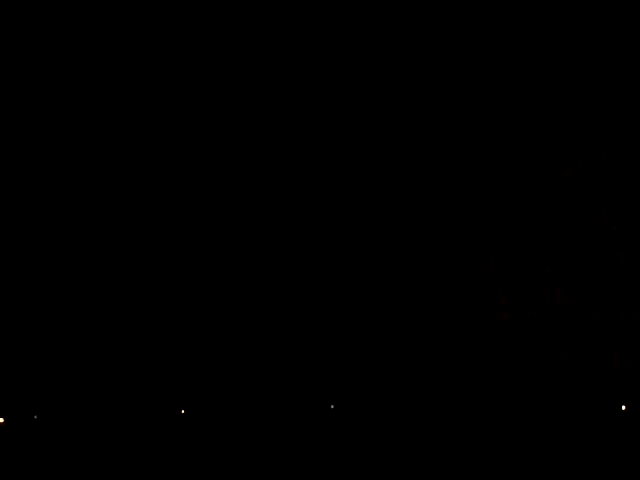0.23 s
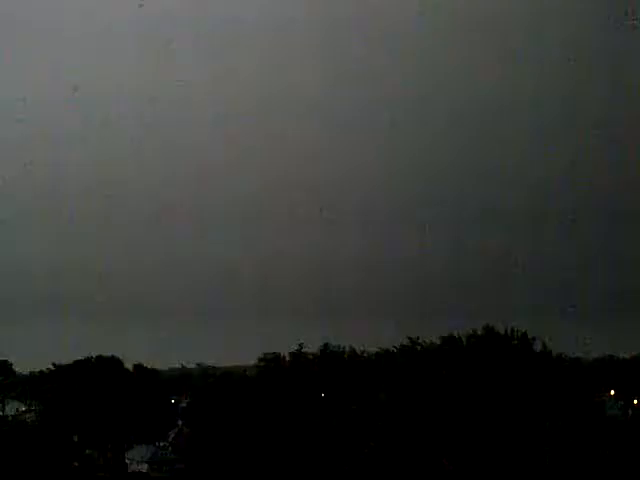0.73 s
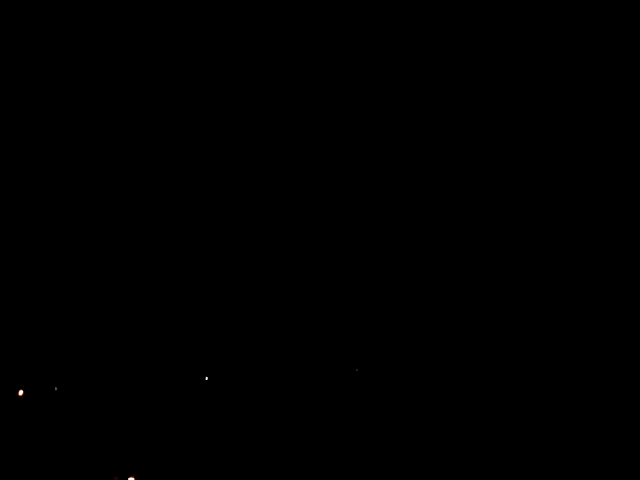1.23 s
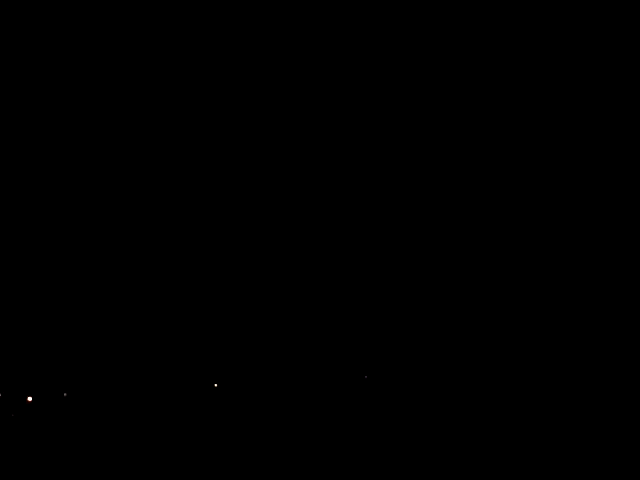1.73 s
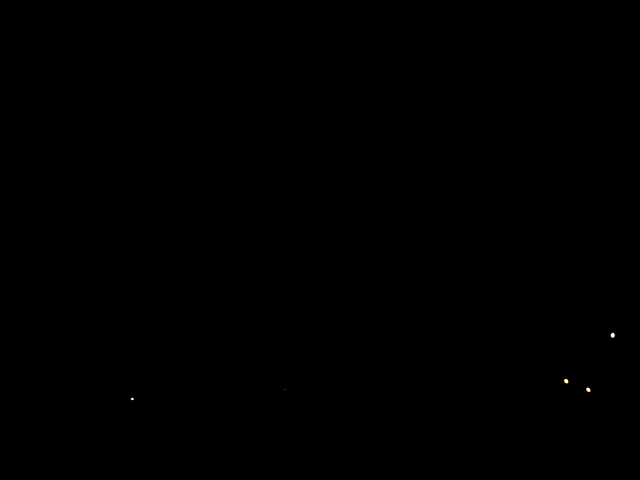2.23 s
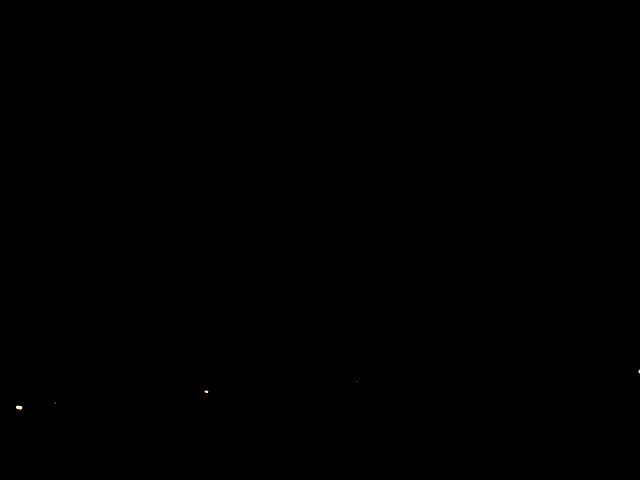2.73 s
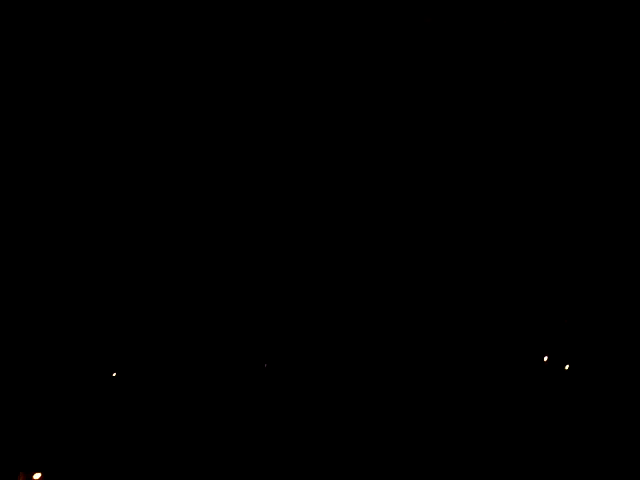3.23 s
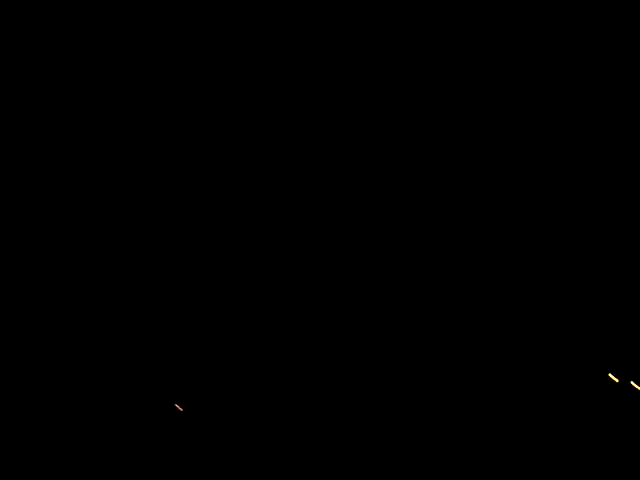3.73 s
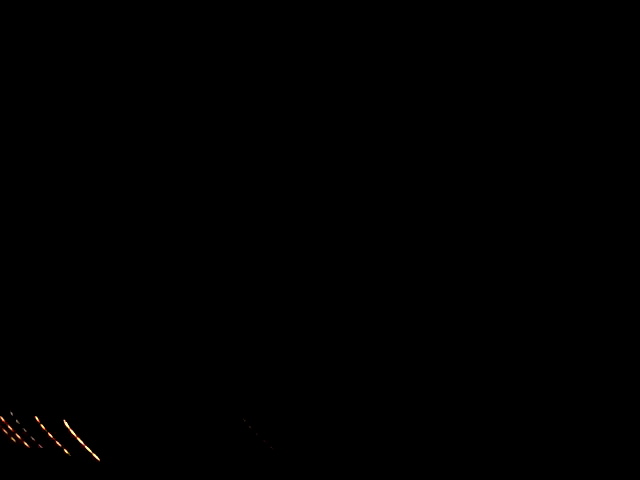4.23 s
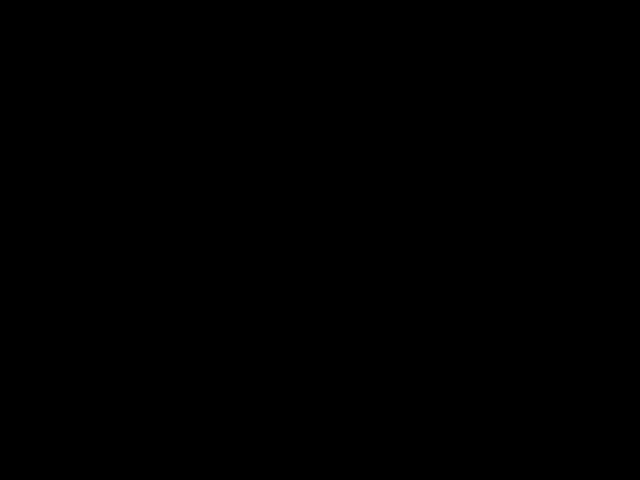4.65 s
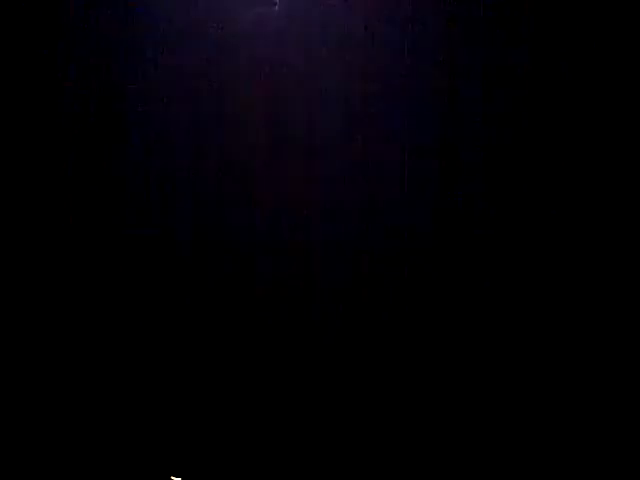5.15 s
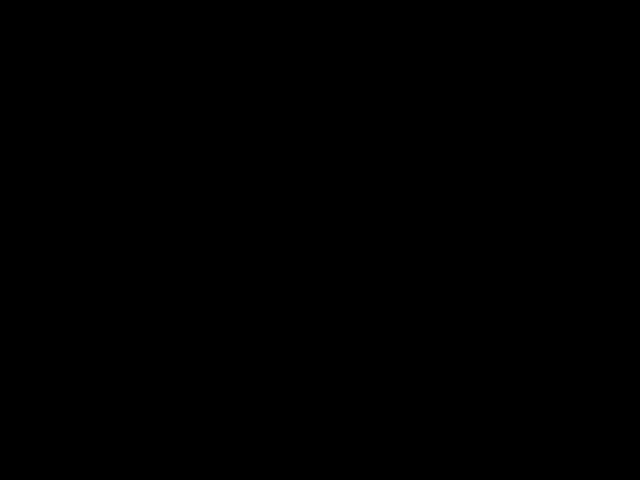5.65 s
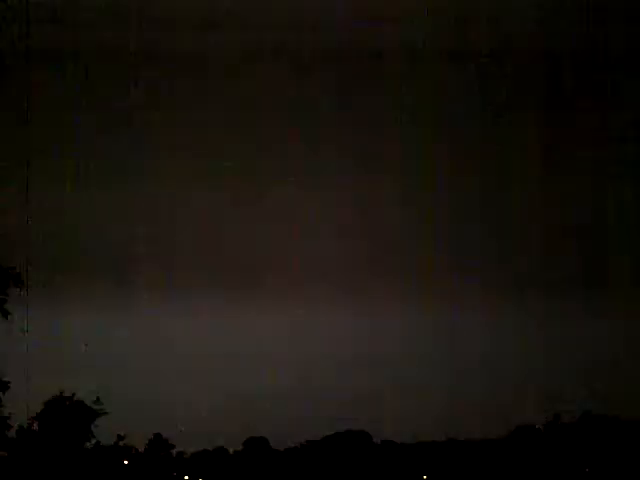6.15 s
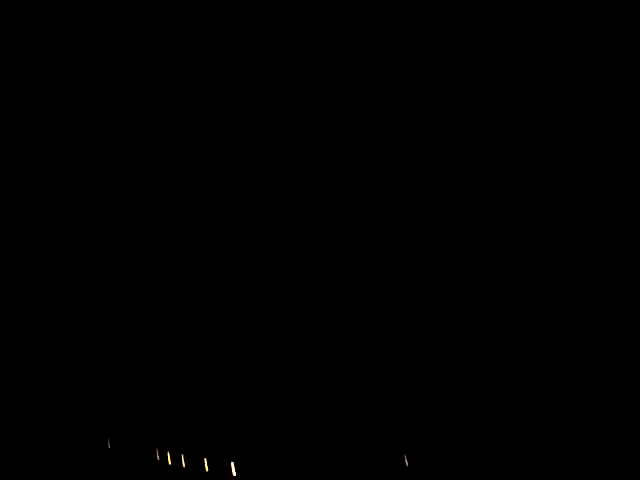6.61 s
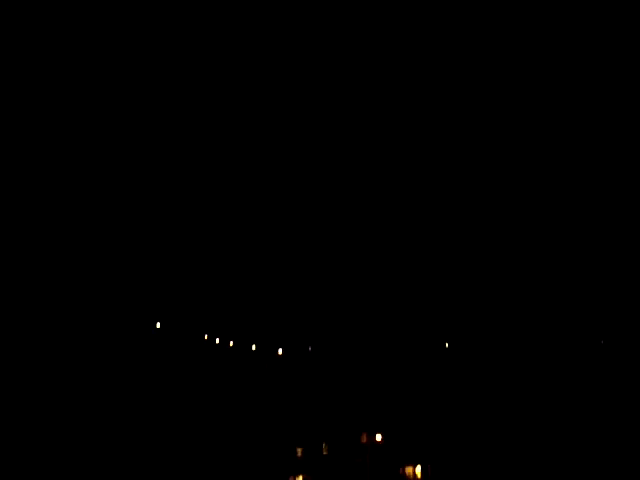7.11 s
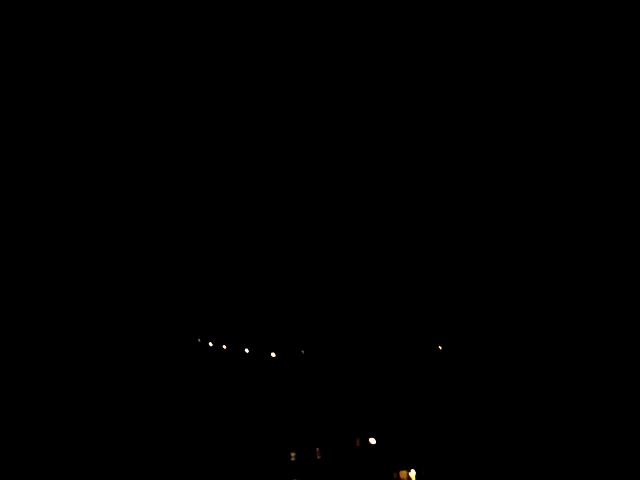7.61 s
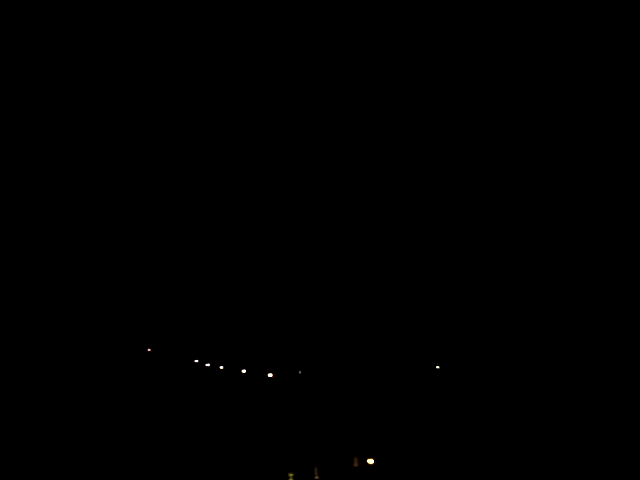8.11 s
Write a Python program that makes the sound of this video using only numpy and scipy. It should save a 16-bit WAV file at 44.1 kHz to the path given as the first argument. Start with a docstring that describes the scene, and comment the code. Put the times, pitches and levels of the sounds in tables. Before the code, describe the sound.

Steady night rain runs throughout, a soft wide wash with closer pattering and sparse tiny ticks, picked up by a small dull-sounding microphone under shelter. Thunder is already rumbling at the start, surging at about 0.6-0.8 s, then growing rougher from 1.2 s with a strong crack near 1.4-1.5 s, rattling and crackling. It keeps rolling in overlapping peals and thuds, strong around 2.4-3.2 s, then eases after 3.4 s. Faint taps occur at 0.5 and 1.25 s; a click at 4.0 s leads to hard hollow handling knocks at 4.15-4.4 s with a faint rustle and soft swish. The close patter drops away by 4.5 s. Low distant rumble continues, swelling at 5.5-6.0 s into a deep, muffled boom, with another brief swish near 6.0 s. Duller rolls return around 6.7-7.5 s, then fade to rain, with a sharp tap at 8.06 s.

```python
"""Thunder rolls in two long swells over steady night rain, heard from a sheltered spot.
Filtered random fronts make it: the first swell is nearer, with claps and rattle, the second far and dull.
Random drop impulses make the wash of rain all around and a closer patter that drops away halfway.
Taps and handling knocks on the microphone housing are ringing sines and short hiss;
a faint rustle close by and brief soft swishes around one pitch are shaped from dense random grains."""
import sys
import numpy as np
from scipy import signal
from scipy.fft import rfft, irfft, next_fast_len
from scipy.io import wavfile
from scipy.ndimage import uniform_filter1d

SR = 44100
rng = np.random.default_rng(int(sys.argv[2]) if len(sys.argv) > 2 else 0)


def transcribe(u):
    """Save the signal u as a 16-bit wav file named by the first command-line argument.

    u: samples, shape (n,) or (channels, n), limited to [-1, 1]; the rate is SR.
    q: integer samples, one column per channel.
    """
    v = np.clip(np.atleast_2d(u).T, -1, 1)
    q = np.round(v * 32767).astype(np.int16)
    wavfile.write(sys.argv[1], SR, q)


N = 369116
TIME = np.arange(N) / SR  # s


def from_db(db):
    """Decibels to amplitude gain."""
    return 10 ** (np.asarray(db) / 20)


def rms_one(x):
    """Scale to unit power."""
    return x / np.sqrt(np.mean(x ** 2) + 1e-20)


def in_time(rows):
    """Each column of a curve, drawn in straight lines between its points, at every sample."""
    moments, *columns = np.transpose(rows)
    return [np.interp(TIME, moments, column) for column in columns]


def coloured(x, spectrum):
    """Causal (minimum-phase) filter with the given spectrum, falling away beyond its ends; rms 1."""
    size = next_fast_len(N + SR // 2, real=True)
    hz, db = np.transpose(spectrum)
    octave = np.log2(np.maximum(np.arange(size // 2 + 1) * SR / size, 1))
    points = np.log2(hz)
    octaves_beyond = np.abs(octave - np.clip(octave, points[0], points[-1]))
    # 20 dB per octave beyond the ends, for two octaves
    level_db = np.interp(octave, points, db) - 20 * np.minimum(octaves_beyond, 2)
    # folding the cepstrum onto positive times gives minimum phase
    cepstrum = irfft(np.log(from_db(level_db)), size)
    cepstrum[1:size // 2] *= 2
    cepstrum[size // 2 + 1:] = 0
    response = np.exp(rfft(cepstrum))
    return rms_one(irfft(rfft(x, size) * response, size)[:N])


def arrivals(per_s, spread_db):
    """Impulses at random moments, many small and a few large; rms 1."""
    sizes = from_db(spread_db * np.minimum(rng.exponential(1, N), 4))
    signed_sizes = sizes * rng.choice([-1, 1], N)
    return rms_one(signed_sizes * (rng.random(N) < per_s / SR))


def evened(x, span_s):
    """Keep the fast grain of a sound and take out its slower swings."""
    size = max(int(span_s * SR / 2), 2)
    power = uniform_filter1d(uniform_filter1d(x ** 2, size), size)
    return x / np.sqrt(np.abs(power) + 1e-6)


def ring(start, hz, t60):
    """A sine that starts at a moment and dies away from height 1, cut off after 0.2 s."""
    out = np.zeros(N)
    first = int(start * SR)
    age = TIME[:min(SR // 5, N - first)]
    out[first:first + len(age)] = np.sin(2 * np.pi * hz * age) * from_db(-60 * age / t60)
    return out


def swell(start, rise_s, t60):
    """An envelope that climbs smoothly to 1 and then dies away."""
    age = TIME - start
    rise = np.sin(np.pi / 2 * np.clip(age / rise_s, 0, 1)) ** 2
    return rise * from_db(-60 * np.maximum(age - rise_s, 0) / t60)


def rain():
    """Countless far drops merge to a wash; fewer, closer ones patter, and the nearest tick one by one."""
    # tone of the wide wash: (f/Hz, relative level per Hz/dB)
    wash_tone = [(300, 3), (600, 2.5), (800, -1), (1080, 2.5), (1350, -2), (1700, -6.5), (2500, -8),
                 (3200, -10.5), (3900, -15), (4700, -16), (6000, -22), (7000, -31.5), (7600, -48.5)]
    # level of the closer patter, which drops away halfway: (t/s, level/dB)
    patter_level = [(0, -53.5), (4.38, -53), (4.52, -75.5), (8.37, -62.5)]
    # tone of the patter: (f/Hz, relative level per Hz/dB)
    patter_tone = [(700, -8), (1300, 2.5), (1900, 3.5), (2500, 2), (3000, -3), (3700, -20.5), (5000, -28),
                   (7000, -38)]
    tick_tone = [(1800, -5.0), (3000, -1.5), (4800, -3), (7000, -11)]
    wash_db, ticks_db = -49, -71
    wash = from_db(wash_db) * coloured(arrivals(per_s=14000, spread_db=2.5), wash_tone)
    patter_gain = from_db(in_time(patter_level)[0])
    patter = patter_gain * coloured(arrivals(per_s=8000, spread_db=3.5), patter_tone)
    ticks = from_db(ticks_db) * coloured(arrivals(per_s=47, spread_db=2.5), tick_tone)
    return wash + patter + ticks


def swishes():
    """Brief soft swishes of uncertain source: dense random grains filtered to a band around one pitch."""
    # swishes: (start t/s, swell/s, crest level/dB, pitch f/Hz, t60/s)
    swish_events = [(4.42, 0.04, -47, 850, 0.4), (6.01, 0.059, -48.5, 1030, 0.2),
                    (6.08, 0.073, -57.5, 3200, 0.85)]
    # their tone: (multiple of the pitch, relative level per Hz/dB)
    swish_tone = [(0.6, -29.5), (0.82, -5), (1, -2.5), (1.12, -6), (1.3, -14), (1.7, -23)]
    out = 0
    for start, rise_s, db, hz, t60 in swish_events:
        tone = [(multiple * hz, tone_db) for multiple, tone_db in swish_tone]
        grains = coloured(arrivals(per_s=7500, spread_db=4.5), tone)
        out = out + from_db(db) * swell(start, rise_s, t60) * grains
    return out


def rustle():
    """A faint, grainy rustle close to the microphone around the handling knocks."""
    tone = [(1200, -1), (2300, 2.5), (3200, -7), (5000, -5), (7000, -19)]
    crest_db = -58
    grains = coloured(arrivals(per_s=2000, spread_db=5.0), tone)
    return from_db(crest_db) * swell(start=4.1, rise_s=0.095, t60=0.9) * grains


def close_taps():
    """Taps and handling knocks on the microphone housing, each a tick, a hissing snap and a modal thud."""
    # taps and knocks, levels ahead of the filters below:
    # (t/s, tick level/dB, tick f/Hz, cycles for the tick to fall 60 dB, snap level/dB, thud level/dB)
    taps = [(0.505, -32, 2950, 16, -58, -58), (1.2463, -33, 3480, 5, -35, -54),
            (3.9722, -27, 2050, 12, -48, -35), (3.973, -33, 3800, 12, -42, -55),
            (4.1536, -52, 2000, 5, -55, -26), (4.165, -22, 1710, 5.5, -20.5, -20.5),
            (4.1748, -36, 1200, 9, -26, -33), (4.1799, -44, 4700, 60, -48, -19),
            (4.1939, -44, 2400, 12, -46, -22), (4.3489, -25.5, 2410, 7.1, -30, -11),
            (4.408, -48, 2980, 5, -33, -58), (8.062, -29, 1100, 3.5, -15, -37)]
    # modes of the housing: (f/Hz, level relative to the thud/dB, t60/s)
    housing_modes = [(240.6, -2, 0.065), (326, -4.5, 0.028), (504, -16.5, 0.042), (715, -9.5, 0.0082),
                     (1100, -15.5, 0.0091)]
    snap_hz, snap_t60 = 5500, 0.00052  # Hz, s
    hiss_db, hiss_rise_s, hiss_t60 = -23, 0.00072, 0.018  # level relative to the snap
    contact_hz, thud_low_hz, tick_top_hz = 1300, 110, 6800  # filter corners
    ticks, thuds = np.zeros((2, N))
    hiss = coloured(rng.standard_normal(N), [(1000, -2), (2500, -3.5), (4000, -2), (7000, -15.0)])
    for start, tick_db, tick_hz, tick_cycles, snap_db, thud_db in taps:
        ticks += from_db(tick_db) * ring(start, tick_hz, tick_cycles / tick_hz)
        snap = ring(start, snap_hz, snap_t60)
        short_hiss = from_db(hiss_db) * swell(start, hiss_rise_s, hiss_t60) * hiss
        ticks += from_db(snap_db) * (snap + short_hiss)
        thuds += sum(from_db(thud_db + db) * ring(start, hz, t60) for hz, db, t60 in housing_modes)
    # the tiny offsets keep the filters out of denormal numbers
    soft = signal.sosfilt(signal.butter(6, contact_hz, fs=SR, output="sos"), thuds + 1e-18)
    ticks = signal.sosfilt(signal.butter(6, tick_top_hz, fs=SR, output="sos"), ticks + 1e-18)
    return ticks + signal.sosfilt(signal.butter(1, thud_low_hz, "high", fs=SR, output="sos"), soft)


def surges():
    """Many fronts arrive together as one short, deep surge."""
    # deep surges: (start t/s, swell/s, crest level/dB)
    surge_events = [(0.6, 0.17, -31), (1.24, 0.07, -46), (1.62, 0.06, -45), (2.04, 0.056, -39),
                    (2.33, 0.05, -39.5), (3.43, 0.06, -39), (4.75, 0.051, -46), (5.71, 0.094, -28),
                    (5.88, 0.059, -40), (6.68, 0.052, -34.5), (6.99, 0.06, -39), (7.41, 0.059, -37)]
    # their tone: (f/Hz, relative level per Hz/dB)
    surge_tone = [(25, -13.5), (40, -0.5), (55, 1), (80, 0.5), (105, 0.5), (140, -4.5), (220, -25.5)]
    t60 = 0.48  # s
    gain = sum(from_db(db) * swell(start, rise_s, t60) for start, rise_s, db in surge_events)
    return gain * evened(coloured(arrivals(per_s=340, spread_db=1.5), surge_tone), span_s=0.049)


def thumps():
    """The strongest fronts stand out as short, soft-edged thuds: decaying sines through a low-pass."""
    # single fronts: (t/s, level ahead of the low-pass/dB, f/Hz, cycles to die away by 60 dB)
    strong_fronts = [(0.711, -20, 105, 10), (0.738, -15, 125, 8), (0.768, -17.5, 185, 13),
                     (0.779, -20, 270, 10), (0.98, -25, 200, 9), (1.283, -20, 222, 4.5),
                     (1.498, -12.5, 218, 6), (1.554, -16, 190, 8), (1.564, -14, 206, 19),
                     (2.004, -22, 190, 14), (2.233, -21, 250, 2), (2.611, -21, 224, 15),
                     (2.902, -19, 350, 15), (2.95, -18, 261, 9), (3.073, -14.5, 228, 15),
                     (3.147, -19, 236, 16), (3.49, -13, 170, 1.5), (3.885, -23, 220, 16),
                     (4.606, -23, 240, 11), (5.074, -21, 231, 8.5), (5.772, -21, 107, 9),
                     (5.786, -19, 130, 9), (5.807, -16, 200, 3), (5.965, -15, 178, 12.5),
                     (6.011, -26, 250, 13), (6.266, -22.5, 237, 14), (6.737, -18, 115, 10),
                     (6.753, -14, 214, 8.5), (7.021, -22, 230, 9), (7.043, -23, 115, 9),
                     (7.284, -26, 250, 14), (7.503, -22.5, 375, 14)]
    thuds = sum(from_db(db) * ring(start, hz, cycles / hz) for start, db, hz, cycles in strong_fronts)
    return signal.sosfilt(signal.butter(3, 520, fs=SR, output="sos"), thuds + 1e-18)


def claps():
    """A bend of the channel that lies across the line of sight arrives all at once, as a rough crack."""
    # tight clusters of fronts in the near swell: (start t/s, crest level/dB)
    clap_events = [(0.358, -37), (0.678, -35), (0.719, -32), (1.258, -29), (1.425, -24.5), (1.452, -30),
                   (1.486, -28.5), (1.569, -36), (2.085, -35), (2.335, -32), (2.61, -29.5), (2.738, -28),
                   (2.98, -33), (3.157, -32)]
    # their tone: (f/Hz, relative level per Hz/dB)
    clap_tone = [(180, -9), (300, -4), (430, 4.5), (600, -1), (800, -10.5), (1100, -20), (1500, -25.5),
                 (2400, -40)]
    rise_s, t60 = 0.0045, 0.1  # s
    gain = sum(from_db(db) * swell(start, rise_s, t60) for start, db in clap_events)
    return gain * evened(coloured(arrivals(per_s=600, spread_db=3.5), clap_tone), span_s=0.044)


def thunder_strength(far):
    """Gains of roll, deep boom, rattle and crackle: the peals add their power to the rumble."""
    # continuous rumble in two long swells, ahead of the offsets below: (t/s, level/dB)
    rumble_curve = [(0.0, -35.5), (0.79, -29.5), (1.07, -33), (1.52, -27), (1.87, -30.5), (2.1, -31),
                    (2.38, -29), (2.96, -28), (3.17, -29), (3.36, -37.5), (3.95, -37), (5.48, -38.5),
                    (5.82, -27.5), (6.2, -31), (6.36, -34.5), (7.2, -34.5), (7.55, -32), (8.37, -39)]
    # peals, one for each stretch of the lightning channel: (start t/s, swell/s, crest level/dB,
    # boom level/dB, rattle level/dB, crackle level/dB; the last three relative to the crest)
    peals = [(0.08, 0.1, -32, -21, -13, -25), (0.47, 0.26, -31, 3.5, -6.5, -30),
             (0.88, 0.1, -39, 5, -17, -18), (1.13, 0.16, -31, -3, -14, -10),
             (1.31, 0.19, -34, -3, 1.5, -2.5), (1.6, 0.15, -35, -2, -4.5, -11.5),
             (1.95, 0.14, -27.5, -11.5, -4.5, -13), (2.13, 0.1, -32, -3, -3, -12),
             (2.46, 0.27, -28, -16, -5.5, -12), (2.8, .19, -27, -14.5, -6.5, -11),
             (2.99, .16, -28.5, -24, -17, -10.5), (3.21, 0.1, -32.5, -4, -6, -9.5),
             (3.39, 0.07, -30.5, -10, -9.5, -17), (3.6, 0.1, -38, -0.5, -18, -17),
             (3.8, 0.14, -33.5, -10.5, -15, -21), (4.48, 0.13, -34, -8, -15, -23),
             (4.7, 0.12, -38, -3, -17, -15), (4.94, 0.1, -36.5, -17, -14, -26),
             (5.5, 0.18, -31.5, -13.5, -28, -28), (5.84, 0.2, -35, -7.5, -15, -27),
             (6.16, 0.12, -38, -3, -22, -31), (6.64, 0.095, -34.5, -3, -14, -25),
             (6.86, 0.17, -31.5, -11, -16, -25), (7.18, 0.12, -35.5, -12, -16, -26),
             (7.35, 0.16, -35, -6, -11, -22), (7.8, 0.25, -47, 5, -29, -21)]
    peal_t60 = 0.72  # s
    roll_offset_db = -1  # relative to the curve
    boom_mean_db, boom_follows = -39.5, 0.55  # the boom lingers: share of the curve's swing it follows
    near_rattle_db, far_rattle_db = -2.5, -47.5  # near: relative to the roll; far: a faint, even level
    crackle_db = -10  # relative to the rattle
    rumble_db, = in_time(rumble_curve)
    roll_db = rumble_db + roll_offset_db
    boom_db = boom_mean_db + boom_follows * (rumble_db - rumble_db.mean())
    rattle_db = (1 - far) * (roll_db + near_rattle_db) + far * far_rattle_db
    power = from_db([roll_db, boom_db, rattle_db, rattle_db + crackle_db]) ** 2
    for start, rise_s, crest_db, *relative_db in peals:
        crests = from_db(crest_db + np.array([0, *relative_db]))
        power += np.outer(crests, swell(start, rise_s, peal_t60)) ** 2
    return np.sqrt(power)


def thunder():
    """Pressure fronts from the kinks of the lightning channel pile up into boom, roll, rattle and crackle."""
    # the near thunder gives way to the far one: (t/s, share of the far one 0-1)
    handover = [(4.2, 0.14), (4.5, 0.94)]
    # tones of the deep boom, near roll, far roll, rattle and bright crackle:
    # (f/Hz, relative level per Hz/dB)
    boom_tone = [(15, -30.5), (30, -14.5), (48, -7.5), (66, -9), (80, -1), (96, -3.5), (115, -3),
                 (150, -8.5), (260, -32)]
    near_roll_tone = [(70, -32), (120, -12), (160, 2), (180, -2.5), (205, 4), (240, -1), (300, -5.5),
                      (345, -3.5), (440, -9), (520, -23.5), (900, -38)]
    far_roll_tone = [(70, -21.5), (115, -5), (165, -4), (215, -1.5), (270, -3.5), (320, -6.5), (375, -16),
                     (450, -18), (620, -28.5), (900, -47)]
    rattle_tone = [(250, -7), (350, 5), (430, 7), (500, 2), (570, 4), (700, -3), (850, -8), (1050, -10.5),
                   (1300, -17.5), (1600, -29.5), (2600, -47.5)]
    crackle_tone = [(450, -14), (720, 5.5), (1000, 0.5), (1200, -4.5), (1500, -15), (2400, -36)]
    roll_trim_db = -0.5  # on the roll of rumble and peals alike
    far = in_time(handover)[0]
    roll_gain, boom_gain, rattle_gain, crackle_gain = thunder_strength(far)
    near_roll = coloured(arrivals(per_s=450, spread_db=2.0), near_roll_tone)
    far_roll = coloured(arrivals(per_s=450, spread_db=0.5), far_roll_tone)  # the air has taken its upper tones
    roll = evened(np.sqrt(1 - far) * near_roll + np.sqrt(far) * far_roll, span_s=0.094)
    boom = evened(coloured(arrivals(per_s=500, spread_db=0.0), boom_tone), span_s=0.18)
    rattle = evened(coloured(arrivals(per_s=2000, spread_db=1.8), rattle_tone), span_s=0.14)
    crackle = evened(coloured(arrivals(per_s=3000, spread_db=1.6), crackle_tone), span_s=0.093)
    low = roll_gain * from_db(roll_trim_db) * roll + boom_gain * boom
    return low + rattle_gain * rattle + crackle_gain * crackle


def scene():
    """All sources, far and close, add up at one microphone."""
    background = rain() + swishes()
    at_microphone = rustle() + close_taps()
    storm = surges() + thumps() + claps() + thunder()
    return (background + at_microphone + storm)[None]


def record(dry):
    """A small narrow-band recorder loses the deepest bass and cuts the treble steeply."""
    low_cut_hz, cutoff_hz = 40, 7250
    thin = signal.sosfilt(signal.butter(2, low_cut_hz, "high", fs=SR, output="sos"), dry)
    # 0.2 dB of ripple below the cutoff, at least 70 dB down in the stop band
    return signal.sosfilt(signal.ellip(10, .2, 70, cutoff_hz, fs=SR, output="sos"), thin)


dry = scene()
out = record(dry)
transcribe(out)
```